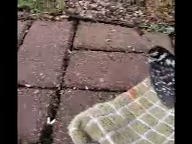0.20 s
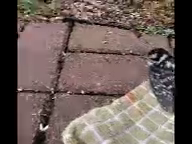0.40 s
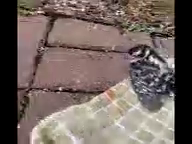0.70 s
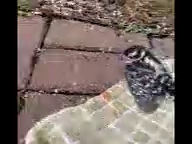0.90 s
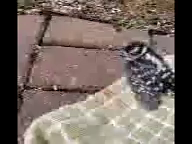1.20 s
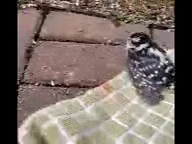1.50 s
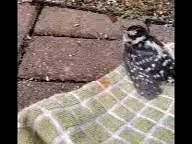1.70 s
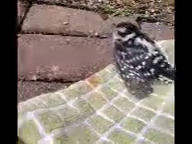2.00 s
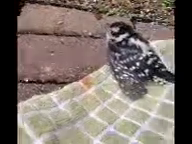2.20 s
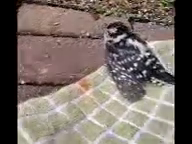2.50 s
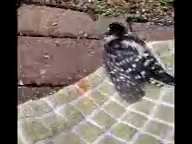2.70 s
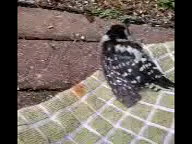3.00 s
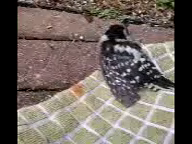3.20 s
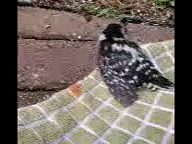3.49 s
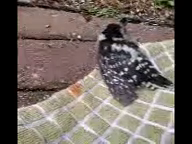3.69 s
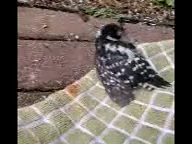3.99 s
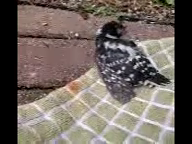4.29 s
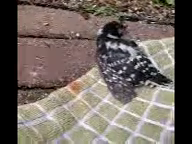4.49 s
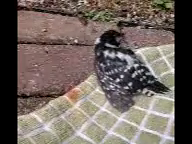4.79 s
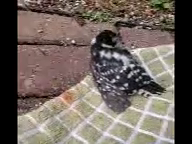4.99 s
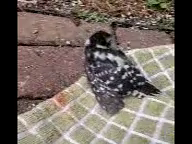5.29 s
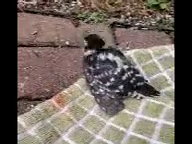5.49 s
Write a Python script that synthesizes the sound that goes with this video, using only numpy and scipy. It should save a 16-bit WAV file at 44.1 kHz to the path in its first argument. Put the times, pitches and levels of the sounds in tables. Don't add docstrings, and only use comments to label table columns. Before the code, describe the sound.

After a sliver of silence, low wind blasts hit the microphone with a tiny rustle of handling. Close, piercing chirps follow at a steady rapid pace, each sweeping up, breaking into a rough high note and soon dropping quickly, ringing between walls. Then the chirping ends and faint, echoing songbird whistles come from far off, over muffled rumble and thin phone hiss.

```python
import sys
import numpy as np
from scipy import signal
from scipy.fft import rfft, irfft
from scipy.io import wavfile
from scipy.ndimage import uniform_filter1d

SR = 44100
rng = np.random.default_rng(int(sys.argv[2]) if len(sys.argv) > 2 else 0)


def wav_out(sig):
    wavfile.write(sys.argv[1], SR, np.round(np.clip(np.atleast_2d(sig).T, -1, 1) * 32767).astype(np.int16))


def boost_factor(decibels):
    exponent = np.asarray(decibels, float) / 20
    return 10 ** exponent


N = 246959
TIME = np.arange(N) / SR

# (time_s, level_db)
WIND_STRENGTH = [(0.07, -39), (0.12, -20), (0.29, -21.5), (0.35, -38.5), (0.5, -47), (0.7, -42),
                 (0.86, -35), (0.96, -51), (1.06, -42.5), (1.42, -48.5), (1.6, -40), (2.3, -41),
                 (2.95, -37), (3.3, -40.5), (3.92, -38), (4.1, -43), (5.1, -38), (5.25, -47)]


def walk(rate_hz):
    hold = int(SR / rate_hz)
    steps = np.repeat(rng.standard_normal(N // hold + 1), hold)
    return 1.11 * uniform_filter1d(uniform_filter1d(steps, hold), hold)[:N]


def noise(colour):
    hz, db = np.transpose(colour)
    bins_hz = np.arange(1, N // 2 + 2) * SR / N
    gain = boost_factor(np.interp(np.log(bins_hz), np.log(hz), db, -90, -90))
    x = irfft(rfft(rng.standard_normal(N)) * gain, N)
    return x / x.std()


def add_whistle(out, s, hz, db, quaver, partials=((1, 0),)):
    a, b = int(s[0] * SR), int(s[-1] * SR)
    t = TIME[a:b]
    phase = 2 * np.pi * np.cumsum(np.interp(t, s, hz) * (1 + quaver[a:b])) / SR
    tone = sum(boost_factor(part_db) * np.sin(k * phase) for k, part_db in partials)
    soft_ends = signal.windows.tukey(b - a, 160 / (b - a))
    out[a:b] += np.sqrt(2) * boost_factor(np.interp(t, s, db)) * tone * soft_ends


def background():
    # (time_s, level_db)
    town = [
        (.07, -68),
        (.11, -55.5),
        (.39, -59),
        (1.4, -58),
        (2.5, -54),
        (3.3, -56),
        (4.1, -54.5),
        (4.68, -57.5),
        (5.1, -56.5),
        (5.6, -57),
    ]
    # (pitch_hz, level_db per Hz)
    hum_colour = [(120, -25), (200, -1), (337, -12.5), (413, -12), (441, -10.5), (482, -13.5), (983, -13),
                  (1370, -18.5), (2370, -26.5), (4200, -34.5), (5460, -68), (9240, -120)]
    # (pitch_hz, level_db per Hz)
    hiss_colour = [(2120, -10), (3600, -8), (3710, -6), (4370, -10), (6050, -16), (6980, -15.5),
                   (8440, -16), (9630, -32.5), (12500, -68.5), (21200, -120)]
    # (time_s, level_db)
    rustle = [
        (.078, -72),
        (.085, -53),
        (.1, -52),
        (.11, -41.5),
        (.12, -48.5),
        (.13, -82),
    ]
    town_db = np.interp(TIME, *np.transpose(town))
    shake_db = 0.33 * np.maximum(np.interp(TIME, *np.transpose(WIND_STRENGTH)) + 41, 0)
    hum = noise(hum_colour) * boost_factor(town_db + shake_db + 2.5 + 0.9 * walk(10))
    hiss_db = -70.5 + 0.39 * (town_db - town_db.mean()) + 4.0
    hiss = noise(hiss_colour) * boost_factor(hiss_db + 1.2 * walk(12))
    rub = noise([(1200, -11.5), (3300, 12), (5500, -3.5), (9500, -14.5)]) * boost_factor(4 * walk(200))
    return hum + hiss + rub * boost_factor(np.interp(TIME, *np.transpose(rustle), -120, -120))


def wind():
    # (pitch_hz, level_db per Hz)
    wind_colour = [(12, -35), (20, -14), (53, 1.5), (101, 3.5), (167, -12.5), (235, -14.5), (325, -30),
                   (414, -26), (499, -39), (600, -50), (780, -43.5), (1320, -120)]
    # (middle_s, swell_db)
    gusts = [(.53, 6), (1.55, 5), (1.66, 4), (1.89, 2.5), (1.95, 2), (2.09, 6), (2.21, 6), (2.46, 7.5),
             (2.62, 0), (2.7, 3.5), (2.84, 3.5), (2.95, 4.5), (3.15, 9), (3.37, 1.5), (4.32, 7.5),
             (4.44, 7), (4.66, 1), (4.75, -2.5), (5.38, 12), (5.6, 12.5)]
    # (start_s, peak_db, pitch_hz)
    buffets = [(.118, -20.5, 132), (.127, -12, 94.5), (.138, -14, 99), (.147, -21, 151), (.163, -18, 112),
               (0.207, -19, 256), (0.208, -12, 82.7), (.236, -22, 213), (0.225, -18.5, 70),
               (.239, -17.5, 80), (.272, -17.5, 79), (0.511, -32, 73), (.703, -28.5, 95.5),
               (1.944, -36, 73), (2.145, -36, 89), (2.847, -29, 77.6)]
    gust_s = 0.02
    db = np.interp(TIME, *np.transpose(WIND_STRENGTH))
    for at, swell_db in gusts:
        db += swell_db * np.exp(-((TIME - at) / gust_s) ** 2)
    eddies = noise(wind_colour) * boost_factor(2.83 * walk(35))
    out = eddies / eddies.std() * boost_factor(db - 2)
    for at, peak_db, hz in buffets:
        cycles = TIME[:SR // 10] * hz
        swing = np.sin(2 * np.pi * cycles ** 0.78)
        swell = np.exp(-cycles / 0.72) * (1 - np.exp(-(cycles / 0.18) ** 2))
        out[int(at * SR):][:len(cycles)] -= boost_factor(peak_db) * 3 * swing * swell
    return out


def songbird():
    # (start_s, length_s, pitch_hz, level_db)
    level_notes = [(3.229, 0.063, 2540, -55), (3.248, .03, 3250, -54), (3.306, 0.041, 2330, -53),
                   (3.44, 0.1, 2342, -67), (3.639, 0.023, 3497, -57.5), (3.653, 0.06, 2663, -50),
                   (3.74, 0.078, 2445, -51.5), (3.75, 0.031, 3540, -61), (3.79, .02, 3034, -50.5),
                   (3.818, 0.019, 2420, -56), (3.894, 0.076, 2450, -60.5), (4.095, .025, 2500, -56),
                   (4.097, 0.043, 2730, -55.5), (4.177, .06, 3490, -58.5), (4.224, 0.036, 2346, -54),
                   (4.293, .04, 2410, -62), (4.395, .035, 2865, -54.5), (4.458, 0.09, 2865, -65),
                   (4.581, 0.044, 2473, -56), (4.734, 0.081, 2265, -61.5)]
    # (start_s, start_hz, end_hz, level_db)
    slurs = [(.445, 2623, 2510, -65.5), (.53, 2700, 2520, -62), (3.17, 2420, 2140, -51),
             (3.21, 2700, 2310, -51), (3.27, 2500, 2060, -56.5), (3.36, 2750, 2194, -62),
             (3.625, 2790, 3080, -59), (3.7, 3250, 2877, -53.5), (3.885, 3200, 2900, -62.5),
             (4.13, 2740, 3190, -52.5), (4.15, 3153, 3320, -48.5), (4.2, 3002, 2850, -49.5),
             (4.25, 3544, 3190, -55.5), (4.27, 3003, 2825, -52), (4.31, 3480, 3280, -61.5),
             (4.615, 3000, 3290, -62), (4.635, 2454, 2168, -56)]
    slur_s, sag = 0.0361, 0.0035
    out, quaver = np.zeros(N), 0.012 * walk(350)
    song = [(at, length, hz, hz * (1 - sag), db) for at, length, hz, db in level_notes]
    song += [(at, slur_s, start_hz, end_hz, db) for at, start_hz, end_hz, db in slurs]
    share = np.array([0, 0.15, 0.8, 1])
    swell_db = np.array([-9.5, -2.5, -7, -16])
    for at, length, start_hz, end_hz, db in song:
        glide_hz = start_hz + (end_hz - start_hz) * share
        add_whistle(out, at + length * share, glide_hz, db + swell_db, quaver)
    return out * boost_factor(5 * walk(200))


def squeaks():
    # (start_s, length_s, top_hz, level_db, rasp sets in at share of length 0-1)
    squeak_list = [
        (2.204, 0.13, 578.4, -45.5, .8),
        (2.379, 0.11, 575, -47, .45),
        (3.041, .118, 591, -47, .25),
    ]
    # (harmonic number, level_db)
    throat = [(2, -16), (3, 0), (4, 0), (5, -6), (6, -22), (7, -22), (8, -27)]
    # (pitch_hz, level_db per Hz)
    air_colour = [(1500, -17.5), (2300, 5), (3100, -1.5), (4000, -16), (6000, -23), (8000, -33)]
    smooth, raspy, break_s = 0.2, 0.73, 0.023
    up_s, down_s, edge_s = 0.02445, 0.0352, 0.0086
    out, wobble, rasp, rough = np.zeros(N), walk(250), walk(700), np.full(N, smooth)
    swell_db = np.array([-15, -4, 0, 0, -4, -15])
    for at, length, hz, db, breaks in squeak_list:
        later = TIME > at
        rough[later] = np.interp(TIME[later] - at - breaks * length, [0, break_s], [smooth, raspy])
        s = np.array([0, edge_s, up_s, length - down_s, length - edge_s, length])
        bend = np.interp(s, s[[0, 2, 3, 4]], [0.885, 1, 1, 0.88])
        add_whistle(out, at + s, hz * bend, db + swell_db, (0.0033 + 0.025 * rough) * wobble, throat)
    loudness = np.sqrt(np.abs(uniform_filter1d(out ** 2, size=300)))
    air = noise(air_colour) * rough * loudness
    return (out * (1 - 0.5 * rough + rough * rasp) + air) * boost_factor(2 * walk(60))


def holds():
    # (start_s, length_s, pitch_hz, level_db)
    hold_list = [(0.159, 0.12, 3500, -43), (0.382, 0.071, 3500, -46.5), (.587, 0.086, 3484, -46.5),
                 (.802, 0.11, 3460, -56), (1.013, 0.18, 3195, -52), (1.228, 0.074, 3180, -56.5),
                 (1.441, 0.11, 3177, -47.5), (1.66, 0.08, 3270, -47), (1.866, 0.099, 3140, -44.5),
                 (2.063, 0.075, 3165, -41), (2.268, 0.063, 3100, -47.5), (2.466, 0.055, 2974, -43),
                 (2.678, 0.073, 3197, -40.5), (2.875, .07, 3070, -48.5), (3.1, 0.083, 3320, -53)]
    attack_s, fade_db = 0.0061, -13.5
    out, quaver = np.zeros(N), 0.015 * walk(500)
    swell_db = np.array([-8, 0, fade_db, fade_db - 9])
    for at, length, hz, db in hold_list:
        s = np.array([0, attack_s, length - attack_s, length])
        add_whistle(out, at + s, np.full(4, hz), db - 2.5 + swell_db, quaver)
    return out * (0.75 + 0.6 * walk(350))


def fledgling():
    # (time_s from the loudest point, pitch_hz, level_db)
    rise = [
        (-.062, 1520, -32),
        (-.05, 1640, -19),
        (-.03, 1770, -12),
        (-.012, 1960, -7),
        (0, 2200, 0),
        (.008, 2500, -6),
        (.014, 3000, -11),
        (.02, 3250, -16),
        (.024, 3280, -30),
    ]
    # (time_s, pitch_hz, level_db)
    fall = [
        (-.002, 3200, -18),
        (0, 3130, -6),
        (.004, 2900, 3),
        (.009, 2550, -5),
        (.013, 2330, 2),
        (.019, 2170, -14),
    ]
    # (time_s from the loudest point, pitch_hz, level_db)
    low_rise = [
        (-.045, 1790, -27),
        (-.03, 1955, -7.5),
        (-.012, 2074, -7),
        (0, 2136, 1),
        (0.012, 2310, -6),
        (.022, 2380, -0.5),
    ]
    # (loudest_s, level_db, slowness, pitch factor, fall delay_s)
    chirps = [(0.7859, -43, 1.05, 1.01, 0.025), (0.997, -45, 1.2, 0.98, 0.029),
              (1.2095, -42.5, 1.01, 1.002, 0.024), (1.4302, -44.5, 1.01, 1, 0.024),
              (1.644, -44, 0.93, 1.013, 0.023), (1.8473, -43, 0.94, 0.99, 0.023),
              (2.053, -42, 1.1, 1.01, 0.025), (2.252, -40.5, 1.09, 0.96, 0.017),
              (2.455, -38.5, 1.2, .99, 0.022), (2.656, -39.5, 1.01, 0.97, 0.033),
              (2.858, -40, 0.91, 0.99, 0.024), (3.0772, -38.5, 0.7, 0.99, .023)]
    # (loudest_s, level_db, slowness)
    low_chirps = [
        (.123, -41, 0.79),
        (0.351, -47, 0.78),
        (0.555, -45.5, 0.91),
    ]
    # (time_s, level_db against the rise)
    fall_growth = [
        (.79, -8),
        (1.5, -2),
        (3.1, -2.5),
    ]
    out, quaver = np.zeros(N), 0.007 * walk(300)
    s, hz, db = np.transpose(rise)
    fall_s, fall_hz, fall_db = np.transpose(fall)
    for at, level_db, slow, pitch, after in chirps:
        add_whistle(out, at + slow * s, pitch * hz, level_db + db, quaver)
        growth_db = np.interp(at, *np.transpose(fall_growth))
        add_whistle(out, at + after + fall_s, pitch * fall_hz, level_db + growth_db + fall_db, quaver)
    s, hz, db = np.transpose(low_rise)
    for at, level_db, slow in low_chirps:
        add_whistle(out, at + slow * s, hz, level_db + db, quaver)
    return out * boost_factor(3.4 * walk(220))


def yard(x, t60_s, wet_db, delay_s, reach_s, late_db, bright_db, echo_db):
    t = TIME[:SR]
    db = -60 * t / t60_s + 3 * walk(150)[:SR] + late_db * np.clip((t - reach_s) / 0.0055, 0, 1)
    db = db + echo_db * np.exp(-((t - 0.2) / 0.031) ** 2)
    tail = rng.standard_normal(SR) * boost_factor(db) * np.clip(t / delay_s, 0, 1) ** 2
    wet = signal.fftconvolve(x, tail / np.sqrt(np.sum(tail ** 2)))[:N]
    bins_hz = np.arange(N // 2 + 1) * SR / N
    tilt_db = bright_db * np.log2(np.clip(bins_hz, 1400, 3400) / 2500)
    return x + irfft(rfft(wet) * boost_factor(wet_db + tilt_db), N)


def scene():
    hold, squeak = holds(), squeaks()
    squeak_wet = 0.45
    near = yard(fledgling() + 0.35 * hold + squeak_wet * squeak, t60_s=0.6, wet_db=-3, delay_s=0.008,
                reach_s=0.09, late_db=-5, bright_db=15, echo_db=6)
    far = yard(songbird(), t60_s=0.8, wet_db=1.5, delay_s=0.012,
               reach_s=0.25, late_db=-8, bright_db=0, echo_db=0)
    dry_birds = 0.77 * hold + (1 - squeak_wet) * squeak
    return (near + dry_birds + far + wind() + background())[None]


def bass_guard(x):
    # (middle_s, length_s, depth_db)
    lulls = [
        (0.547, 0.025, -22),
        (1.281, 0.056, -18),
        (1.718, 0.048, -28),
        (1.771, .06, -18),
        (1.83, 0.057, -37),
        (2.01, 0.06, -10),
        (2.876, 0.026, -22),
        (3.04, 0.042, -27),
        (3.419, 0.042, -10),
        (4.703, 0.051, -19),
    ]
    db = sum(depth_db * np.exp(-(2 * (TIME - at) / length) ** 4) for at, length, depth_db in lulls)
    bass = signal.sosfiltfilt(signal.butter(4, 290, fs=SR, output="sos"), x)
    return x - bass * (1 - boost_factor(db))


def starve(x, margin_db, slope_db, hole_db, share):
    spectrum = signal.stft(x, nperseg=1024)[2]
    power = (abs(spectrum[:512]) ** 2).reshape(128, 4, -1).sum(axis=1)
    bands = 10 * np.log10(power + 1e-18)
    mask = np.max([np.roll(bands, k, axis=0) - slope_db * k for k in range(1, 4)], axis=0)
    calls = bands[10:20]
    busy = np.clip((calls.max(axis=0) - np.percentile(calls, 80)) / 15, 0.1, 1)
    luck = np.repeat(rng.random((128, bands.shape[1])), 2, axis=1)[:, :bands.shape[1]]
    masked = (bands < mask - margin_db) & (luck < 0.6)
    hidden = masked | (luck < share * busy)
    hidden[:19] = False
    spectrum[:512] *= np.repeat(np.where(hidden, boost_factor(hole_db), 1), 4, axis=0)
    return signal.istft(spectrum, nperseg=1024)[1][:N]


def roll_off(x):
    return signal.sosfilt(signal.butter(12, 9780, fs=SR, output="sos"), x)


def record(dry):
    rounded = 0.7 * np.tanh(dry[0] / 0.7)
    x = starve(bass_guard(rounded), margin_db=9, slope_db=4, hole_db=-25, share=0.25)[None]
    fade_in = np.clip((TIME - 0.075) / 0.0048, 0, 1)
    return roll_off(x * fade_in)


dry = scene()
out = record(dry)
wav_out(out)
```